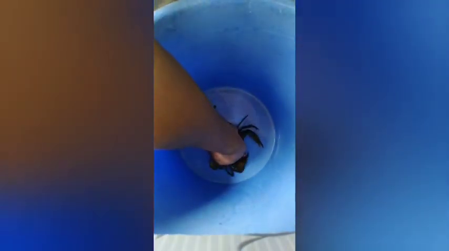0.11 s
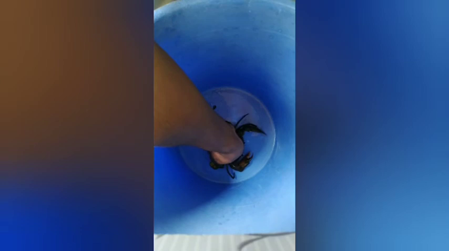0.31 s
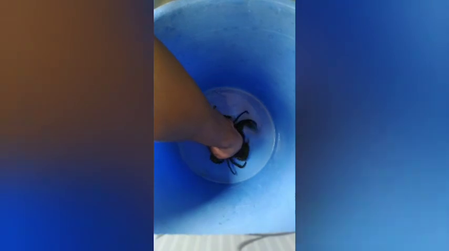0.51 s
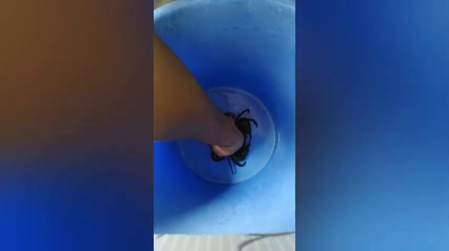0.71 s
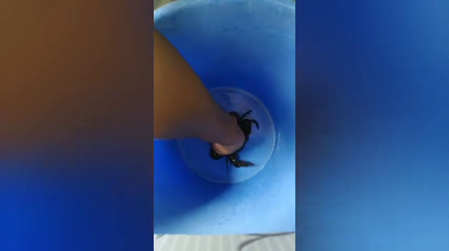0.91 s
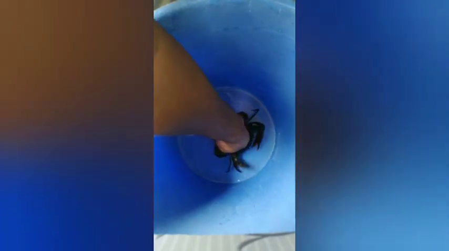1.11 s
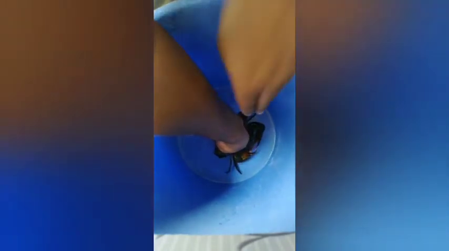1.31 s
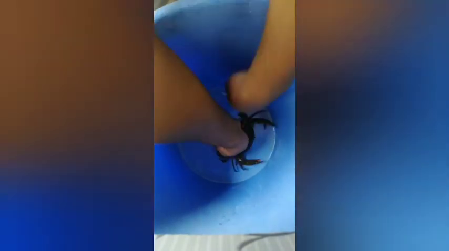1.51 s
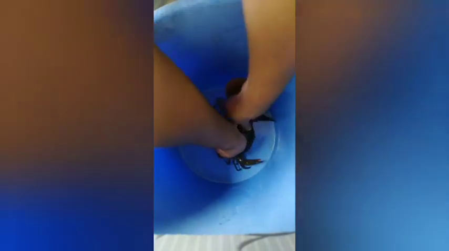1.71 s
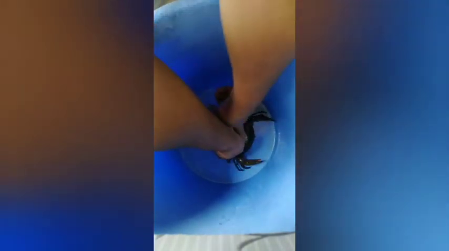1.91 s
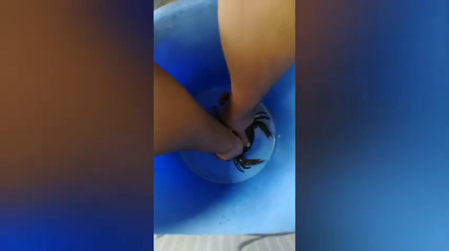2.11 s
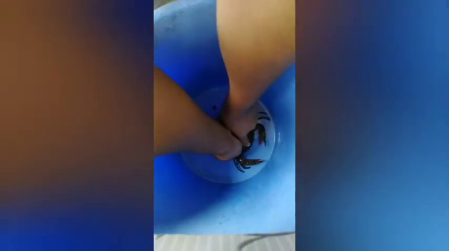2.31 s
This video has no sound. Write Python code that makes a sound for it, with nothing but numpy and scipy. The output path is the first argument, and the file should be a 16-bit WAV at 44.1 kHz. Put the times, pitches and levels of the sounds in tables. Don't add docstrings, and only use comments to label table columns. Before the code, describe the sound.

Crab legs and claws scrape a plastic bucket, close and mostly on the right. After brief quiet, a soft drag at 0.2 s grows into the loudest gritty scrape with a hard crack near 0.43 s, more central. Hollow scrabbles, squeaks and ticks follow from 0.57 to 1.35 s, a small knock at 1.45, then faint yard air with a weak tick near 2.0 and soft rubs until the end.

```python
import sys
import numpy as np
from scipy import signal
from scipy.io import wavfile
from scipy.ndimage import uniform_filter1d

SR = 44100
rng = np.random.default_rng(int(sys.argv[2]) if len(sys.argv) > 2 else 0)


def output_pcm(signal):
    pcm = np.clip(np.atleast_2d(signal).T, -1, 1) * 32767
    wavfile.write(sys.argv[1], SR, np.round(pcm).astype(np.int16))


def magnitude_from_level(level_db):
    exponent = np.asarray(level_db, float) / 20
    return 10 ** exponent


N = 105840
LAG = 18
LEFT_DIRECT = 0.6

# frequency [Hz], width [Hz], level [dB].
WALL = [(422, 210, -14.5), (588, 105, -7.5), (693, 39, -1), (824, 86, -5), (1025, 106, -2), (1200, 80, 2),
        (1374, 90, 1.5), (1447, 248, -3)]
# frequency [Hz], width [Hz], level [dB].
TIPS = [(1952, 56, -14), (2505, 145, -7), (2795, 43, 0), (3100, 1180, -4.5), (3830, 2060, -11),
        (5040, 900, -16.5), (6500, 340, -15), (7780, 2000, -20), (9800, 830, -32.5), (14000, 2500, -47)]


def rms_one(x):
    return x / np.sqrt(np.mean(x ** 2) + 1e-20)


def at_hz(points, hz):
    table_hz, value = np.transpose(points)
    return np.interp(np.log(hz), np.log(table_hz), value)


def drift(rate):
    r = np.exp(-80 * np.pi * rate / SR)
    slow = signal.lfilter([1], [1, -2 * r, r * r], rng.standard_normal(N // 40 + 2002))
    slow = rms_one(slow[2000:])
    return np.interp(np.arange(N) / 40, np.arange(len(slow)), slow)


def resonate(x, hz, width_hz):
    r = np.exp(-np.pi * width_hz / SR)
    zeros = np.array([1, 0, -1]) * (1 - r * r) / 2
    poles = [1, -2 * r * np.cos(2 * np.pi * hz / SR), r * r]
    return signal.lfilter(zeros, poles, x + 1e-18)


def sides(pan_db):
    left = magnitude_from_level(pan_db)
    return 2 * np.array([left, np.ones_like(left)]) / np.sqrt(1 + left ** 2)


def place(out, start_s, pan_db, sound):
    for ch, gain in enumerate(sides(pan_db)):
        i = int(start_s * SR) + LAG * (1 - ch)
        out[ch, i:i + len(sound)] += gain * sound


def slips():
    slips_per_s, spread_db = 5000, 2.6
    size = magnitude_from_level(spread_db * np.minimum(rng.exponential(1, (2, N)), 3.5))
    size = size * rng.choice([-1, 1], (2, N))
    happens = rng.random((2, N)) < slips_per_s / SR
    return rms_one(size * magnitude_from_level(1.8 * drift(70)) * happens)


def ports(pair, direct):
    d = np.clip(direct, 0, 1)
    left = d * np.roll(pair[0], LAG) + np.sqrt(1 - d * d) * pair[1]
    return np.array([left, pair[0]])


def strokes(rows, direct):
    flat, bend = 1.35, 1.6
    t, force = np.arange(N) / SR, np.zeros((2, N))
    for start_s, length_s, db, rise, pan_db in rows:
        u = (t - start_s) / length_s
        rise = np.clip(rise, .01, .99)
        ramps = np.minimum(u / rise, (1 - u) / (1 - rise))
        shape = np.clip(flat * ramps, 0, 1) ** bend
        force += shape * magnitude_from_level(db) * sides(pan_db)[:, None]
    return ports(slips(), direct) * force


def body(x, modes, wander_db, rate):
    gains = [magnitude_from_level(db + wander_db * drift(rate)) for hz, width_hz, db in modes]
    power = sum(g * g * np.pi * width_hz / SR for g, (hz, width_hz, db) in zip(gains, modes))
    out = 0
    for k, (hz, width_hz, db) in enumerate(modes):
        out = out + (-1) ** k * resonate(x * gains[k] / np.sqrt(power), hz, width_hz)
    return out


def dull(x, hz):
    return signal.sosfilt(signal.butter(3, hz, fs=SR, output="sos"), x)


def leg_drags():
    # start [s], length [s], level [dB], share of rise [0-1], left-right difference [dB].
    drag_rows = [(.175,0.13,-36.5,0.21,-17),(.352,0.14,-28.5,0.23,-7.5),(.44,0.13,-21.5,0.34,-3),(.568,0.053,-32,0.17,-12.5),
                 (.63,0.063,-30,0,-17),(.684,0.073,-25.5,0,-11),(.73,0.084,-29.5,0.45,-19),(.8,0.39,-47,0.02,-12),
                 (.908,0.2,-31,0.02,-17.5),(.99,0.043,-33,0.64,-23),(1.027,0.067,-23.5,0.36,-19.5),(1.07,0.068,-27,0.58,-16),
                 (1.125,0.049,-28,0.23,-12.5),(1.206,0.042,-41,0.19,-15),(1.265,0.047,-35,0.51,-17),(1.3,0.1,-31.5,0.11,-16.5),
                 (1.448,0.058,-33,0,-8.5),(1.493,0.051,-45.5,0,-8),(1.56,0.057,-54,0.12,-1),(1.98,0.038,-39,0,-12)]
    return dull(body(strokes(drag_rows, LEFT_DIRECT), WALL, wander_db=3.1, rate=19), hz=2340)


def claw_skates():
    # start [s], length [s], level [dB], share of rise [0-1], left-right difference [dB].
    skate_rows = [(.18,0.1,-40.5,0.27,-23),(.368,0.11,-31,0.08,-24),(.436,0.13,-23.5,0.23,-2),(.568,0.051,-35.5,0.33,-23),
                  (.622,0.071,-32.5,0,-24),(.678,0.039,-28,0.12,-27),(.7,0.079,-35.5,0,-13.5),(.74,0.056,-36,0.65,-21),
                  (.822,0.044,-44.5,0.18,-22),(.905,0.15,-24.5,0.03,-27),(.985,0.042,-35.5,0.5,-9),(1.03,0.13,-25,0.29,-27),
                  (1.135,0.052,-44.5,0,-11),(1.212,0.041,-46,0,-13),(1.275,0.15,-40,0.18,-11.5),(1.449,0.059,-40,0.05,-18),
                  (1.48,0.085,-53.5,0.3,-3),(1.71,0.0075,-57,0.2,4),(1.98,0.06,-54.5,0.4,-7),(2.14,0.03,-56,0.5,-10),(2.22,0.049,-54.5,0.5,1)]
    hiss = body(strokes(skate_rows, direct=0.59), TIPS[:6], wander_db=4.0, rate=12.6)
    return dull(hiss, hz=4790)


def fine_grit():
    # start [s], length [s], level [dB], share of rise [0-1], left-right difference [dB].
    grit_rows = [(.185,0.12,-52,0.15,-13),(.375,0.037,-46,0,-23),(.436,0.11,-31,0.36,-11),
                 (.622,0.067,-39,0.22,-35),(.678,0.042,-38.5,0.08,-31),(.7,0.057,-41.5,0.3,-24),(.76,0.041,-54,0.5,-17),
                 (.908,0.12,-37,0.28,-38),(.99,0.083,-49,0.5,-25),(1.03,0.12,-34,0.39,-45),
                 (1.14,0.032,-40.5,.08,-14),(1.212,0.05,-45.5,0,-14),(1.449,0.087,-51.5,0.06,-6),
                 (1.71,0.015,-57,0.3,0),(1.98,.04,-45.5,0,-21),(2.22,0.038,-57.5,0.4,1)]
    return body(strokes(grit_rows, direct=0.37), TIPS[5:], wander_db=-3.0, rate=20)


def finger_rubs():
    # start [s], length [s], level [dB], share of rise [0-1], left-right difference [dB].
    rub_rows = [
        (.495,0.04,-29,0.38,-7),
        (2.07,0.095,-63.5,0.05,-17),
        (2.135,0.18,-53,0.01,-15),
        (2.205,0.12,-48,0.29,-12),
    ]
    return body(strokes(rub_rows, LEFT_DIRECT), WALL[:4], wander_db=4.5, rate=10.7)


def shell_cracks():
    # start [s], length [s], level [dB], share of rise [0-1], left-right difference [dB].
    crack_rows = [
        (.386,0.098,-29,0.02,-13),
        (.432,0.026,-22,0,18),
    ]
    # frequency [Hz], width [Hz], level [dB].
    shell_modes = [(1696,53,1.5),(1905,83,-6),(2770,300,-5),(3620,350,-2.5),(5200,1140,-13.5)]
    return body(strokes(crack_rows, direct=0.19), shell_modes, wander_db=0.5, rate=7.1)


def dwells():
    # start [s], length [s], level [dB], pitch [Hz], left-right difference [dB].
    dwell_rows = [(0.363,.012,-39,1270,-17),(0.382,0.019,-33,2340,3),(0.434,0.016,-25.5,1730,24),(0.442,0.0027,-23.5,3220,22),
                  (0.471,0.015,-26,1820,12),(0.491,0.022,-30.5,2350,-10),(0.5,0.0082,-31,466,-1),(0.566,0.033,-33.5,986,-25),
                  (0.757,0.026,-36.5,1130,-15),(0.905,0.053,-31.5,2440,-12),(0.914,0.016,-35,720,-20),(0.927,0.067,-35,1240,-24),
                  (1.03,0.011,-25.5,1203,-29),(1.051,0.015,-29.5,1200,-26),(1.092,0.025,-26,1344,-28),(1.101,0.015,-29,661,-17),
                  (1.207,0.019,-46,1225,-22),(1.3,0.015,-31,1352,-32),(1.318,0.012,-28.5,1347,-26),(1.323,0.027,-38,802,-19),
                  (1.982,0.011,-41.5,666,-10),(1.979,0.0085,-48.5,2700,-20)]
    sharpness, rise_share, release_s = 20, .45, 0.012
    out, t = np.zeros((2, N + SR)), np.arange(SR // 10) / SR
    for start_s, length_s, db, hz, pan_db in dwell_rows:
        ring = resonate(rng.standard_normal(len(t) + 900), hz, hz / sharpness)
        ring = resonate(ring, hz, 4 * hz / sharpness)[900:]
        ring /= np.sqrt(uniform_filter1d(ring ** 2, size=500))
        swell = np.sin(np.pi / 2 * np.minimum(t / length_s / rise_share, 1)) ** 2
        fade = np.exp(-np.maximum(t - length_s, 0) / release_s)
        place(out, start_s, pan_db, magnitude_from_level(db) * ring * swell * fade)
    return out[:, :N]


def shoves():
    # start [s], length [s], level [dB], left-right difference [dB], upper modes [dB].
    shove_rows = [(0.21,0.05,-43.5,-18,-6),(0.414,0.019,-36,-7.5,3),(0.494,0.036,-26,-3.5,6),(0.587,0.015,-38,-18,7),
                  (0.639,0.016,-29.5,-20,-0.5),(0.685,0.03,-24.5,-9.5,-9),(0.739,0.036,-40,-16,7.5),(0.809,0.11,-56.5,-13,-6),
                  (0.92,0.045,-44,-18,3),(1,0.026,-33.5,-19,1),(1.033,0.0049,-36,-20,10),(1.08,0.01,-28.5,-17,-8),(1.11,0.036,-28,-13.5,-7.5),
                  (1.211,0.02,-45.5,-12,7),(1.304,0.059,-50.5,-16,-0.5),(1.448,0.034,-47.5,-14,-8),(1.584,0.042,-49,-22,-3.5),
                  (1.997,0.0069,-55,-30,5),(2.195,0.091,-57,-9,14),(2.269,0.043,-47,-12,-12)]
    # frequency [Hz], width [Hz], level [dB].
    air_modes = [(160.3, 35, -15), (188, 200, -12.5), (233.4, 16.2, 0.5), (269, 19, -10), (319.7, 113, -1),
                 (358.8, 36.6, -6)]
    attack_s, release_s = 0.0078, 0.019
    rumble_cut = signal.butter(2, 140, "high", fs=SR)
    out, t = np.zeros((2, N + SR)), np.arange(SR // 5) / SR
    for start_s, length_s, db, pan_db, upper_db in shove_rows:
        push = rng.standard_normal(len(t)) * (0.75 + 1.0 * np.exp(-t / attack_s))
        boom = 0
        for k, (hz, width_hz, mode_db) in enumerate(air_modes):
            gain = magnitude_from_level(mode_db + upper_db * (k > 2) + rng.normal(0, 1.94))
            boom = boom + (-1) ** k * gain * resonate(push, hz, width_hz) / np.sqrt(width_hz)
        boom = rms_one(signal.lfilter(*rumble_cut, boom))
        boom *= np.exp(-np.maximum(t - length_s, 0) / release_s)
        boom /= np.sqrt(np.sum(boom ** 2) / SR / length_s)
        place(out, start_s, pan_db, magnitude_from_level(db) * boom)
    return out[:, :N]


def ticks():
    # start [s], peak [dB], share of low knock [0-1], left-right difference [dB].
    tick_rows = [
        (.4315,-8,.05,-1.5),
        (.624,-23,.2,-22),
        (.691,-14,.45,-20.5),
        (1.11,-20.5,.3,-22),
        (1.449,-20,.65,-15),
        (1.983,-29,.5,-18),
    ]
    out, t = np.zeros((2, N + SR)), np.arange(SR // 10) / SR
    for start_s, db, knock, pan_db in tick_rows:
        decay = np.exp(-t / .0008) + .4 * np.exp(-t / .004)
        burst = rng.standard_normal(len(t)) * decay * np.minimum(t / .0003, 1)
        crack = resonate(burst, 2900, 1200) + .7 * resonate(burst, 5300, 1500)
        low = resonate(burst, 1050, 200) + resonate(burst, 680, 120)
        k = np.clip(knock, 0, 1)
        hit = (1 - k) * crack / np.abs(crack).max() + k * low / np.abs(low).max()
        place(out, start_s, pan_db, magnitude_from_level(db + 6) / 2 * hit)
    return out[:, :N]


def yard():
    # frequency [Hz], density [dB per Hz].
    yard_spectrum = [(40, -23.5), (125, -7.5), (659, -12.5), (1400, -13.5), (2400, -17.5), (3700, -19),
                     (7130, -22), (15000, -44)]
    # frequency [Hz], left-right likeness [-1 to 1].
    likeness = [(60, 1), (130, 0.81), (290, 0.77), (700, 0.23), (1400, -0.49), (3000, 0.15)]
    yard_db, hum_hz, hum_db = -57.5, 577.7, -67
    out, together = 0, drift(3)
    edges = 30 * 2 ** np.arange(0, 9.1, .5)
    white = rng.standard_normal((2, 2, N))
    for k, (low, high) in enumerate(zip(edges, edges[1:])):
        band = signal.butter(2, [low, high], "band", fs=SR, output="sos")
        mid, side = signal.sosfilt(band, white[k % 2])
        hz = np.sqrt(low * high)
        alike = np.clip(at_hz(likeness, hz), -.95, .95)
        gain = magnitude_from_level(at_hz(yard_spectrum, hz) + .7 * together + 1.2 * drift(10))
        out = out + gain * (np.sqrt(1 + alike) * mid + np.sqrt(1 - alike) * side * [[1], [-1]])
    out = out - .6 * resonate(out, 1400, 500) - .6 * resonate(out, 3700, 700)
    hum = rms_one(resonate(resonate(white[0], hum_hz, 16), hum_hz, 16))
    return magnitude_from_level(yard_db + 2.0) * rms_one(out) * magnitude_from_level([[-.8], [.8]]) + magnitude_from_level(hum_db) * hum


def scene():
    scraping = leg_drags() + claw_skates() + fine_grit() + finger_rubs() + shell_cracks()
    return scraping + dwells() + shoves() + ticks() + yard()


def roll_off(x):
    return signal.sosfilt(signal.butter(12, 15950, fs=SR, output="sos"), x)


def record(dry):
    shade = signal.lfilter(*signal.butter(1, 5000, fs=SR), dry[0])
    bass_cut = signal.butter(2, 75, "high", fs=SR, output="sos")
    x = signal.sosfilt(bass_cut, np.array([shade, dry[1]]))
    low = signal.sosfilt(signal.butter(8, 7800, fs=SR, output="sos"), x)
    high = signal.sosfilt(signal.butter(2, [8300, 13200], "band", fs=SR, output="sos"), x)
    top = signal.cheby2(12, 50, 16300, fs=SR, output="sos")
    return roll_off(signal.sosfilt(top, low + magnitude_from_level(-8.5) * high))


dry = scene()
out = record(dry)
output_pcm(out)
```